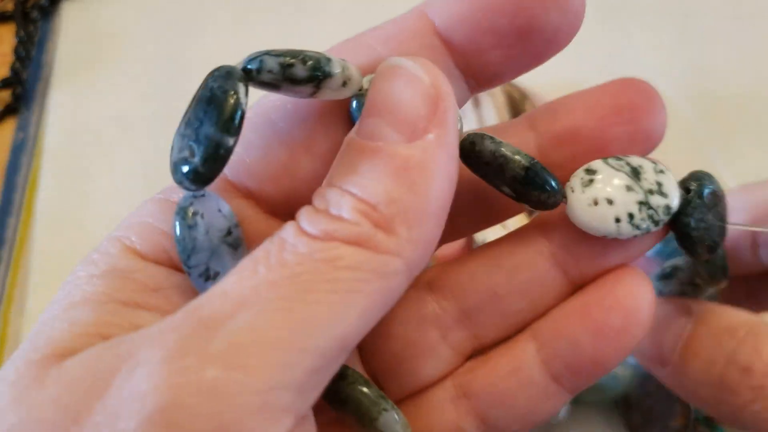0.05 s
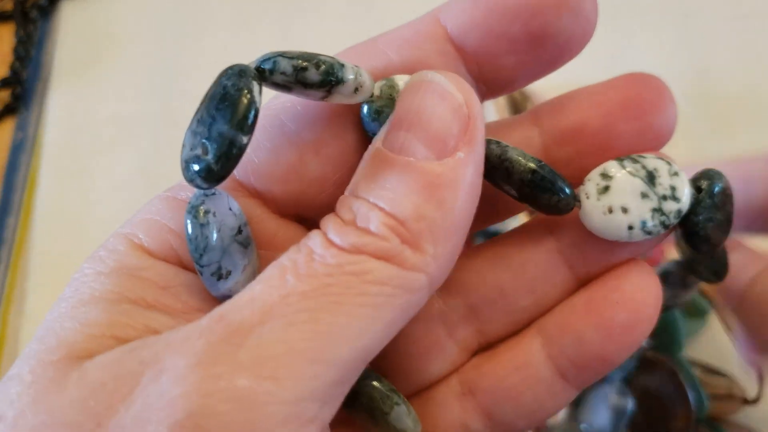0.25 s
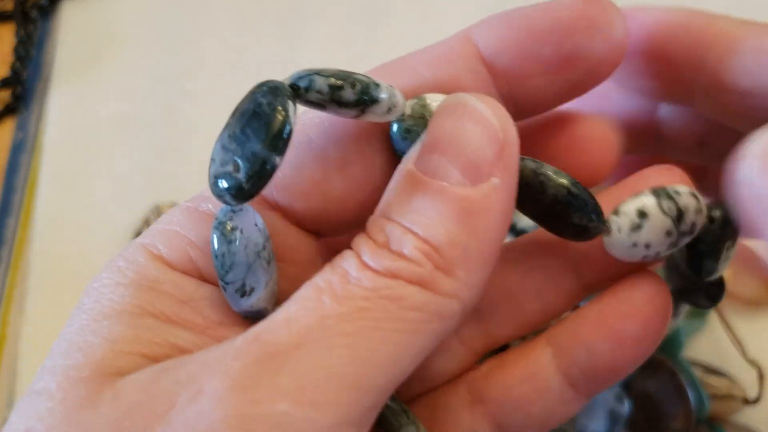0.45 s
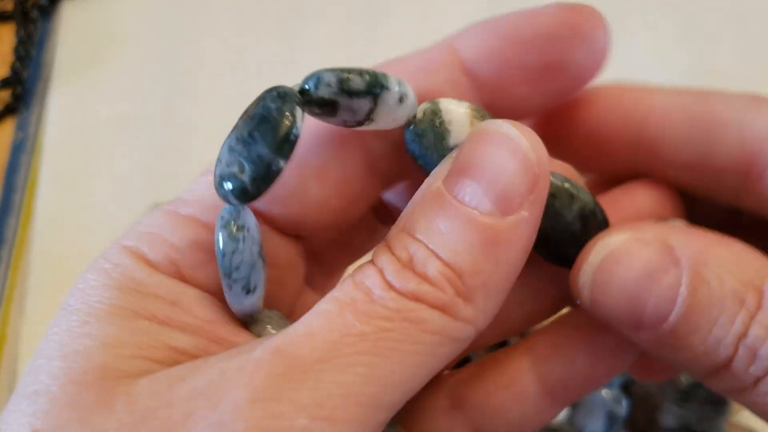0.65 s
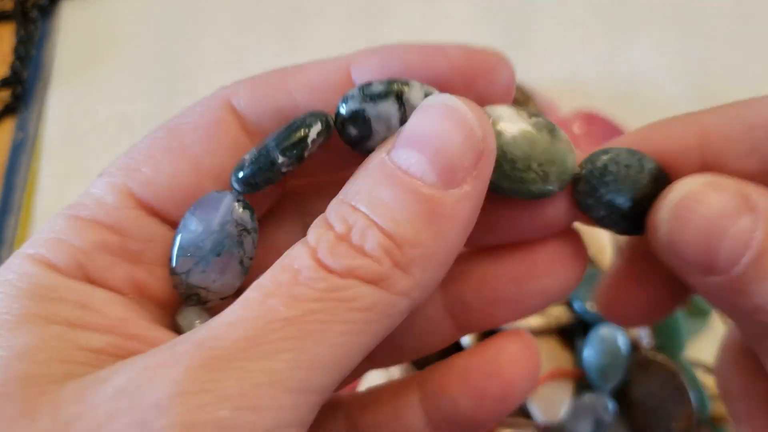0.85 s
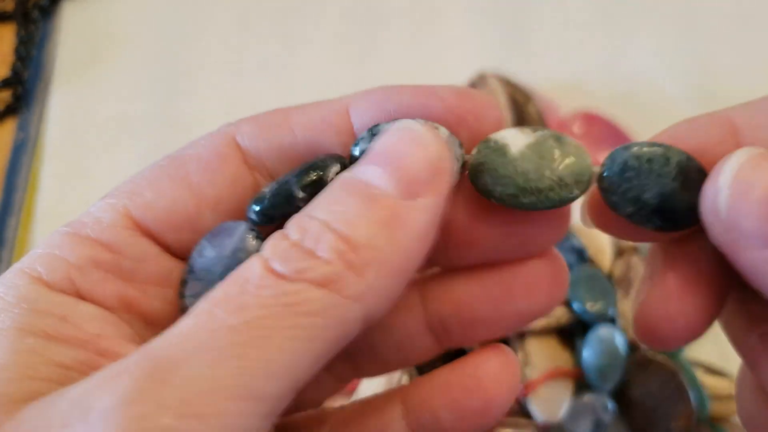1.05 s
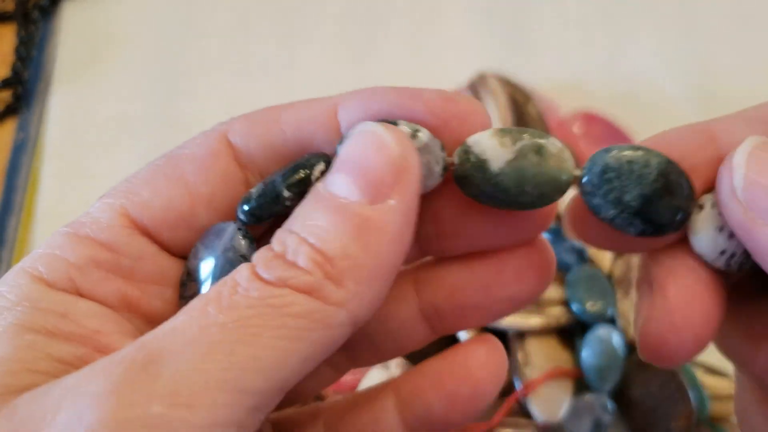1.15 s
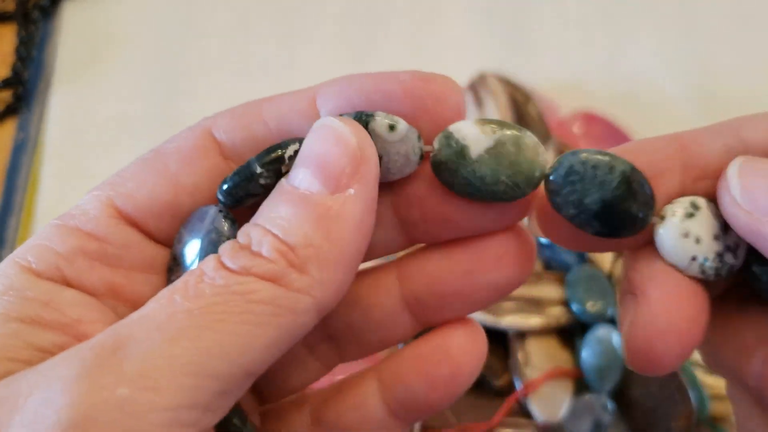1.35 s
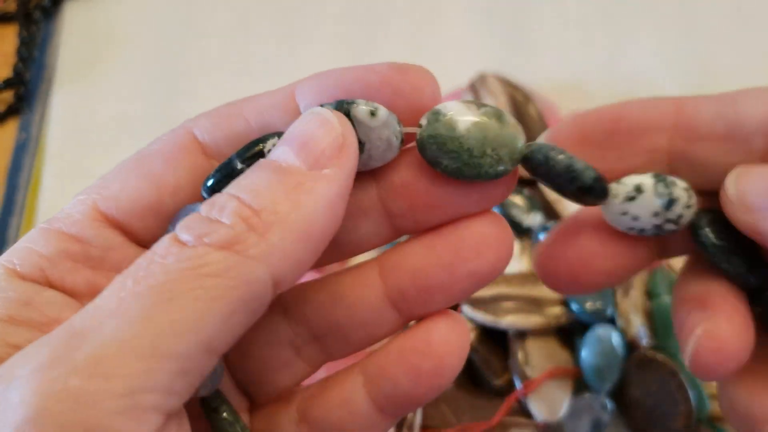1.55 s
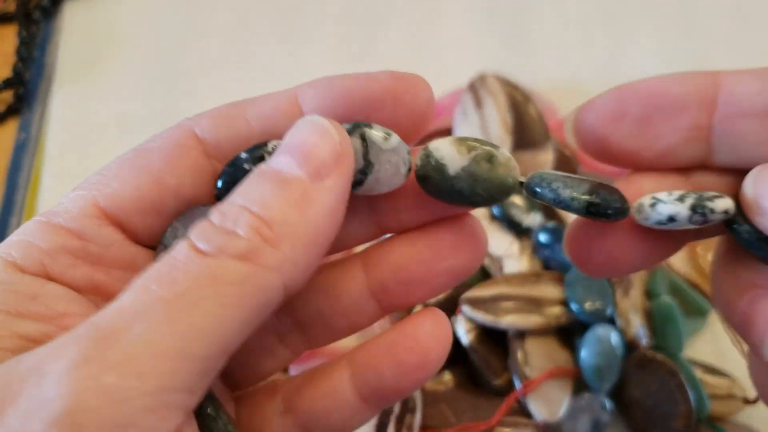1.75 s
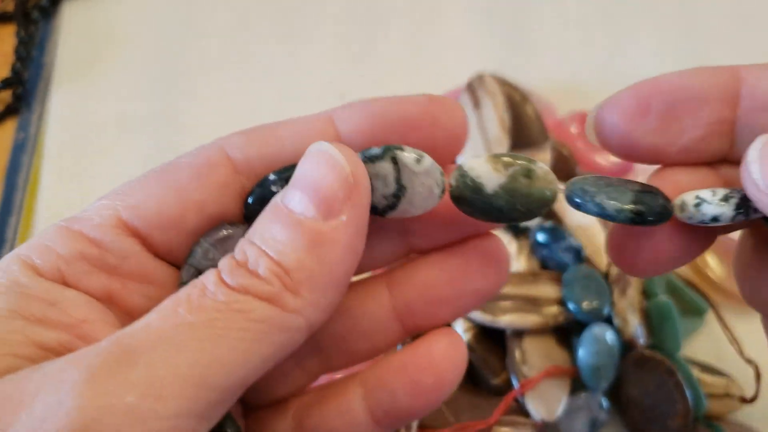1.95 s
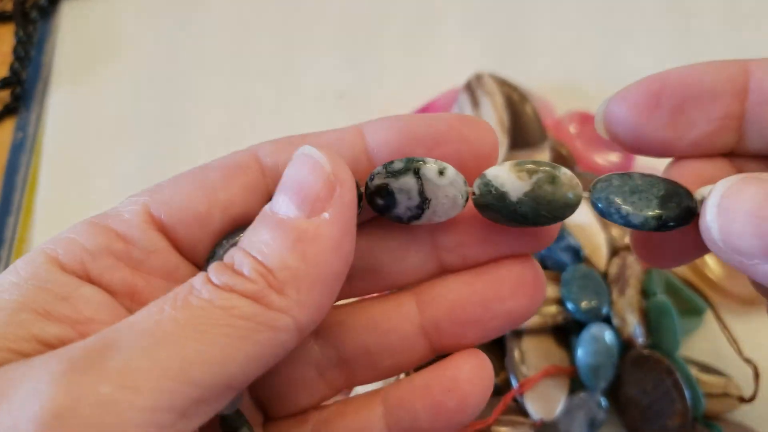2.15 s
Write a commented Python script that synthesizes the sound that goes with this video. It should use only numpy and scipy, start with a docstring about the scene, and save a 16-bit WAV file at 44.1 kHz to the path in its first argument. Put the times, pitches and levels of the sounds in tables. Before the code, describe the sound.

Stone beads on a strand knock together in a crisp, bright rattling burst near the start, then brush softly and give sparse faint clicks; close microphone, quiet small room with low hum and slight hiss.

```python
"""Polished stone beads on a strand click together in two hands, close to a phone in a quiet room.
Each knock is a short coloured crack that scatters off fingers and nearby beads, returns once from
the table, sets the table humming and dies in the room. Around the knocks there are dense tiny ticks
of beads brushing, filtered noise of skin on stone, and squeaks of narrow noise. Behind them lie
a low hum like narrow noise, resonant rumble, the steady sines of an appliance's whine and microphone hiss."""
import sys
import numpy as np
from scipy import signal
from scipy.fft import rfft, irfft
from scipy.io import wavfile

SR = 44100
rng = np.random.default_rng(int(sys.argv[2]) if len(sys.argv) > 2 else 0)


def to_wav(sig):
    """Store sig (one row per channel, or 1-D mono) as 16-bit WAV at the path in sys.argv[1].

    Samples outside -1..1 are clipped; the rate is SR.
    """
    pcm = np.clip(np.atleast_2d(sig), -1, 1) * 32767
    pcm = np.round(pcm).astype(np.int16)
    wavfile.write(sys.argv[1], SR, pcm.T)  # frames by channels


N = 97020
SIDES = np.array([[1], [-1]])  # sign of a left-right difference at the left and right microphone


def undb(db):
    """Amplitude factor for a level in dB."""
    return 10 ** (np.asarray(db) / 20)


def curve(table):
    """Gain over time from (time [s], level [dB]) rows."""
    s, db = np.array(table).T
    return undb(np.interp(np.arange(N) / SR, s, db))


def unit(x):
    """Signal scaled to rms 1."""
    return x / np.sqrt(np.mean(x ** 2))


def shaped(gain):
    """White noise coloured by a gain over frequency."""
    f = np.arange(N // 2 + 1) * SR / N + 1  # 1 Hz up, so that a logarithm is safe
    return irfft(rfft(rng.standard_normal(N)) * gain(f), N)


def band(hz, width_hz):
    """Noise through one resonance, width taken at half amplitude, rms 1."""
    return unit(shaped(lambda f: 1 / (1 + ((f - hz) / (width_hz / 2)) ** 2)))


def fade(seconds, t60):
    """Exponentially decaying noise, independent at each microphone."""
    t = np.arange(int(seconds * SR)) / SR
    return rng.standard_normal((2, len(t))) * 1000 ** (-t / t60)


def causal(db):
    """Minimum-phase spectrum for a gain in dB, by folding its cepstrum forward in time."""
    cepstrum = irfft(db * np.log(10) / 20)
    half = cepstrum.shape[-1] // 2
    cepstrum[..., 1:half] *= 2
    cepstrum[..., half + 1:] = 0
    return np.exp(rfft(cepstrum))


def microphone_hiss():
    """Steady room tone and hiss: coloured noise, wider in stereo with pitch, drifting slowly in level."""
    # colour of the hiss: (frequency [Hz], relative density [dB per Hz])
    hiss_colour = [(20, -24.5), (45, -18), (100, -17), (300, -26.5), (500, -37), (800, -43), (2000, -47),
                   (5300, -54.5), (6000, -47), (6600, -43), (7200, -45), (8200, -58.5), (11500, -47.5),
                   (15300, -48.5), (15900, -61)]
    level_db, wide_hz, drift_db = -69.5, 940, 1.74  # drift is its rms
    hz, db = np.array(hiss_colour).T

    def colour(f):
        return undb(np.interp(np.log(f), np.log(hz), db))

    mid = shaped(colour)
    side = shaped(lambda f: colour(f) * np.clip(f / wide_hz, .3, 1))
    drift = unit(shaped(lambda f: 1 / (1 + (f / 3.6) ** 2)))
    return undb(level_db) * (mid + SIDES * side) * undb(drift_db * drift) / np.std(mid)


def appliance_whine():
    """Faint steady sines, each with its own random phase at each microphone."""
    # partials of the whine: (frequency [Hz], rms level before a 3 dB lift [dB])
    partials = [(6245, -102), (6363, -93), (6481, -100), (6600, -96), (6724, -100), (6842, -90),
                (6961, -98)]
    t = np.arange(N) / SR
    whine = 0
    for hz, db in partials:
        sine = np.sin(2 * np.pi * (hz * t + rng.random((2, 1))))
        whine = whine + 2 * undb(db) * sine  # root 2 from rms to peak, root 2 for the lift
    return whine


def room_rumble():
    """Noise in the low resonances of the room, mostly common to both microphones."""
    # level of the rumble: (time [s], level [dB])
    rumble_levels = [(0.0, -73), (0.02, -83), (0.31, -64), (0.37, -74), (0.81, -61), (0.95, -65.5),
                     (1.35, -66), (1.38, -72), (1.54, -64.5), (1.59, -70.5), (1.67, -62.5), (2.2, -63.5)]
    # low resonances of the room: (frequency [Hz], width [Hz], relative level [dB])
    rumble_modes = [(122, 33, -4.5), (172.8, 14, -0.5), (203.6, 36, 1), (246.9, 21.8, 1), (291.5, 25, -8.5),
                    (360.4, 27.94, -15.5), (415.4, 4.3, -14.5)]
    side_db = -10.5
    mid, side = (sum(undb(db) * band(hz, w) for hz, w, db in rumble_modes) for _ in range(2))
    return curve(rumble_levels) * (unit(mid) + SIDES * undb(side_db) * unit(side))


def room_hum():
    """Lowest room resonance, like narrow noise: a sine of random pitch and level, and some side noise."""
    # one random course of the narrow noise's level: (time [s], level [dB])
    hum_course = [(0.0, -70), (0.07, -70), (0.1, -59), (0.32, -58), (0.42, -66.5), (0.45, -58.5),
                  (0.61, -66.5), (0.72, -52.5), (0.8, -58.5), (0.89, -54), (0.97, -63.5), (1.07, -58.5),
                  (1.2, -68), (1.23, -58.5), (1.48, -66.5), (1.52, -77), (1.62, -59.5), (1.73, -70),
                  (1.75, -65), (1.94, -65.5), (2.05, -83.5), (2.2, -61)]
    hum_hz, wander_hz, side_db = 72.8, 4.1, -13.5  # wander is its rms
    wander = wander_hz * unit(shaped(lambda f: 1 / (1 + (f / 7.6) ** 2)))
    sine = np.sqrt(2) * np.sin(2 * np.pi * np.cumsum(hum_hz + wander) / SR)
    return curve(hum_course) * (sine + SIDES * undb(side_db) * band(hum_hz, 20))


def space(dry):
    """Adds the table's decaying sines and the room's diffuse tail, stronger in its lower part."""
    # resonances of the table: (frequency [Hz], level [dB], time to fall 60 dB [s])
    table_modes = [(480, -24, 0.05), (846, -41.5, 0.034), (1055, -34, 0.013)]
    room_db, start_s, top_hz = -39.5, .006, 15700
    split_hz, low_db, t60_s = 5240, 6, .23

    def part(kind):
        split = signal.butter(2, split_hz, kind, fs=SR, output="sos")
        return signal.sosfilt(split, fade(.5, t60_s))

    low, high = part("low"), part("high")
    t = np.arange(low.shape[1]) / SR
    onset = np.minimum(t / start_s, 1) ** 2
    tail = undb(room_db) * (undb(low_db) * low + high) * onset
    tail = signal.sosfilt(signal.ellip(8, .2, 40, top_hz, fs=SR, output="sos"), tail)
    for hz, db, t60 in table_modes:
        tail += undb(db) * np.sin(2 * np.pi * hz * t) * 1000 ** (-t / t60)
    return dry + signal.fftconvolve(dry, tail, axes=1)[:, :N]


def squeaks():
    """Faint narrow noise, centred between the microphones, that swells and fades."""
    # squeaks: (start [s], length [s], frequency [Hz], level at the height of the swell [dB])
    squeak_rows = [(0.547, 0.17, 3110, -84.5), (0.873, 0.16, 2960, -86.5), (1.028, 0.1, 2350, -87.5)]
    width_hz = 110
    t = np.arange(N) / SR
    total = 0
    for start, length, hz, db in squeak_rows:
        swell = np.sin(np.pi * np.clip((t - start) / length, 0, 1)) ** .5
        total = total + undb(db) * band(hz, width_hz) * swell
    return total


def rub():
    """Soft friction of skin sliding over stone: resonant noise, independent at each microphone."""
    # level of the sliding: (time [s], level before a 3 dB lift [dB])
    rub_levels = [(0.4, -106), (0.436, -89), (0.792, -79), (0.924, -87), (1.15, -94)]
    # resonances of the friction: (frequency [Hz], width [Hz], relative level [dB])
    rub_modes = [(3080, 370, -1), (4850, 900, 1.5), (2430, 3500, 4.5)]
    t = np.arange(N) / SR
    on = (t > rub_levels[0][0]) & (t < rub_levels[-1][0])
    noise = [unit(sum(undb(db) * band(hz, w) for hz, w, db in rub_modes)) for _ in range(2)]
    return on * curve(rub_levels) * np.sqrt(2) * np.array(noise)


def brush():
    """Beads brush past each other: dense random ticks of uneven size through a broad band."""
    # level of the brushing: (time [s], level [dB])
    brush_levels = [(.8, -72), (.825, -72.5), (.84, -59), (.86, -67.5), (.9, -75), (.93, -85)]
    ticks_per_s, centre_hz, width_hz = 27000, 8300, 10100
    ticks = (rng.random((2, N)) < ticks_per_s / SR) * rng.laplace(size=(2, N))
    edges = centre_hz - width_hz / 2, centre_hz + width_hz / 2
    ticks = signal.sosfilt(signal.butter(1, edges, "band", fs=SR, output="sos"), ticks)
    t = np.arange(N) / SR
    on = (t > brush_levels[0][0]) & (t < brush_levels[-1][0])
    return on * curve(brush_levels) * unit(ticks)


def beads():
    """Each knock is a minimum-phase crack, smeared by a long contact, scattered and echoed once."""
    # knocks: (time [s], relative level in each of the five bands [dB] x 5,
    # left minus right [dB], length of the contact [ms])
    knocks = [(0.0517, -59, -49, -45, -47, -44, 1, 0.63), (0.1111, -46, -34, -28, -25, -26, -2, 0.44),
              (0.1131, -45, -35, -31, -29, -29, -2, 0.46), (0.115, -52, -39, -33, -31, -33, -2, 0.62),
              (0.2223, -11, -7, -1, -3, 8, -2, 0.29), (0.2233, -22, -16, -4, -8, 2, 0, 0.47),
              (0.2248, -23, -22, -12, -13, -7, 4, 0.69), (0.2266, -23, -20, -13, -15, -5, -3, 0.58),
              (0.2328, -15, -17, -11, -12, 0, 3, 0.41), (0.2353, -18, -12, -11, -14, -1, 2, 0.62),
              (0.2364, -17, -16, -12, -9, -3, -1, 0.59), (0.2441, -1, 0, 2, 0, 7, -1, 0.33),
              (0.2465, -7, -10, -5, -2, -1, -2, 0.47), (0.2479, -16, -13, -10, -7, -3, 1, 0.58),
              (0.2489, -14, -14, -11, -12, -5, 0, 0.55), (0.2523, -22, -19, -21, -16, -6, 4, 0.45),
              (0.2565, -15, -16, -14, -7, 0, -2, 0.35), (0.259, -13, -10, -10, -3, 0, -1, 0.64),
              (0.2608, -20, -15, -15, -11, -9, -1, 0.59), (0.2686, -24, -20, -24, -18, -16, -1, 0.75),
              (0.2746, -18, -17, -9, -15, -11, 5, 0.57), (0.2793, -24, -23, -11, -21, -18, 6, 0.69),
              (0.2873, -20, -20, -13, -10, -3, 0, 0.28), (0.2921, -22, -20, -19, -18, -13, -1, 0.39),
              (0.2964, -9, -7, -3, -2, 5, -3, 0.5), (0.2993, -18, -12, -12, -6, 0, -2, 0.58),
              (0.3032, -17, -15, -11, -10, -11, 2, 0.6), (0.3083, -17, -18, -10, -11, -9, 0, 0.46),
              (0.3095, -23, -19, -14, -12, -9, 4, 0.68), (0.3135, -30, -29, -19, -22, -17, -4, 0.72),
              (0.3235, -30, -30, -20, -26, -22, 1, 0.54), (0.3334, -27, -26, -30, -20, -16, -1, 0.53),
              (0.3909, -39, -34, -29, -23, -30, -7, 0.55), (0.5381, -43, -44, -37, -32, -38, -4, 0.61),
              (0.6344, -47, -47, -46, -51, -58, -1, 0.68), (0.6529, -48, -46, -40, -48, -54, 6, 0.8),
              (0.6674, -52, -46, -49, -60, -59, 1, 0.58), (0.7001, -53, -41, -42, -58, -57, 6, 0.7),
              (0.7167, -45, -36, -39, -48, -55, 7, 0.68), (0.7517, -43, -28, -28, -33, -41, 8, 0.52),
              (0.8122, -47, -47, -35, -45, -50, 6, 0.8), (0.8315, -41, -43, -35, -39, -40, 2, 0.65),
              (0.8356, -35, -33, -22, -26, -30, 2, 0.69), (0.8374, -39, -34, -27, -29, -33, 0, 0.66),
              (0.8459, -45, -42, -28, -28, -29, -3, 0.7), (0.8568, -52, -45, -34, -41, -45, -2, 0.77),
              (0.9037, -52, -51, -43, -51, -51, 4, 0.7), (0.9816, -46, -53, -62, -67, -62, -3, 0.8),
              (1.1272, -44, -44, -47, -49, -45, 2, 0.56), (1.1295, -21, -20, -14, -18, -24, 6, 0.56),
              (1.131, -31, -27, -19, -30, -35, 10, 0.74), (1.146, -27, -29, -19, -22, -20, 2, 0.49),
              (1.1498, -34, -32, -27, -24, -25, 1, 0.45), (1.1839, -44, -44, -38, -42, -45, 0, 0.7),
              (1.2718, -55, -53, -39, -40, -43, 1, 0.71), (1.3532, -57, -45, -40, -41, -41, -5, 0.29),
              (1.3603, -61, -56, -44, -47, -53, 0, 0.73), (1.3874, -51, -33, -30, -29, -36, -2, 0.46),
              (1.742, -49, -47, -45, -49, -51, 4, 0.34), (1.7656, -46, -34, -25, -24, -27, -3, 0.37),
              (1.7792, -57, -52, -46, -39, -39, -13, 0.46), (1.8657, -45, -42, -30, -39, -46, 3, 0.75),
              (1.8854, -37, -33, -22, -12, -16, 0, 0.38), (1.8874, -48, -42, -29, -25, -30, -2, 0.56),
              (1.9045, -55, -51, -46, -43, -40, 2, 0.53), (1.914, -46, -45, -50, -44, -43, 2, 0.74),
              (2.0596, -56, -56, -46, -46, -52, 0, 0.6), (2.0861, -51, -48, -37, -50, -54, 1, 0.77)]
    # bands common to all cracks: (centre [Hz], gain [dB], left minus right [dB])
    crack_bands = [(2632, 1.5, 1), (4580, -0.5, 2), (6950, -0.5, 3), (9260, -1.5, -1.5), (13600, 3.5, 1.5)]
    # slope below the bands: (frequency [Hz], level relative to the lowest band [dB])
    crack_lows = [(100, -45.5), (500, -31), (1500, -19.5), (2000, -7.5)]
    # end of the slope above the bands: (frequency [Hz], level relative to the highest band [dB])
    crack_top = (16600, -10)
    knock_db = -1
    ring_hz, ring_width_hz, ring_db = 7200, 600, 6
    echo_s, echo_spread_s, echo_db = .0011, .0002, -14  # off the table
    scatter_db, scatter_start_s, scatter_t60_s = -18.5, .0013, .013  # off fingers and nearby beads
    # random differences between the microphones, as standard deviations
    ripple_db, scatter_rad, turn_rad, lag_s = 1.5, .4, .85, .000015
    sharpest_ms, smear_rad_per_ms = .27, 5.5

    size, lead = 1024, 128  # samples in a crack, and ahead of its onset
    out = np.zeros((2, N + 2 * size))
    f = np.arange(size // 2 + 1) * SR / size + 1
    knots = np.linspace(0, SR / 2, 16)  # frequencies of the random curves
    chance = rng.standard_normal((len(knocks), 2, 3, 16))
    hz, gain_db, side_db = np.array(crack_bands).T
    edges = np.log([p[0] for p in crack_lows] + list(hz) + [crack_top[0]])
    ring = ring_db / (1 + ((f - ring_hz) / (ring_width_hz / 2)) ** 2)
    common_db = knock_db + np.interp(f, hz, gain_db) + ring
    common_db = common_db + SIDES * np.interp(f, hz, side_db) / 2
    swell = undb(scatter_db) * np.minimum(np.arange(size) / SR / scatter_start_s, 1) ** 2

    for (s, *levels, pan_db, contact_ms), c in zip(knocks, chance):
        lows = [levels[0] + p[1] for p in crack_lows]
        db = np.interp(np.log(f), edges, lows + levels + [levels[-1] + crack_top[1]])
        ripple, turn = (np.array([np.interp(f, knots, v) for v in c[:, k]]) for k in range(2))
        db = db + common_db + SIDES * pan_db / 2 + ripple_db * ripple

        # phase differences between the microphones grow with pitch
        phase = (scatter_rad * turn + turn_rad * c[:, 2, 1:2]) * np.minimum(f / hz[3], 1)
        # a grinding contact smears
        phase += smear_rad_per_ms * (contact_ms - sharpest_ms) * np.interp(f, knots, c[0, 2])
        phase -= 2 * np.pi * f * (lead / SR + lag_s * c[:, 2, 2:3])
        crack = irfft(causal(db) * np.exp(1j * phase))
        scatter = swell * fade(size / SR, scatter_t60_s)
        crack = crack + signal.fftconvolve(crack, scatter, axes=1)[:, :size]

        for mic in range(2):
            delay_s = echo_s + echo_spread_s * c[mic, 2, 0]
            for late_s, late_db in ((0, 0), (delay_s, echo_db)):
                # the crack's onset lies 10 samples before the listed time
                i = int((s + late_s) * SR) - lead - 10
                out[mic, i:i + size] += undb(late_db) * crack[mic]
    return out[:, :N]


def scene():
    """Knocks and brushing excite table and room; the other layers are added without that response."""
    background = microphone_hiss() + appliance_whine() + room_rumble() + room_hum()
    return background + squeaks() + rub() + space(beads() + brush())


def record(dry):
    """The phone cuts the top steeply, above 16600 Hz."""
    return signal.sosfilt(signal.ellip(10, .2, 80, 16600, fs=SR, output="sos"), dry)


dry = scene()
out = record(dry)
to_wav(out)
```